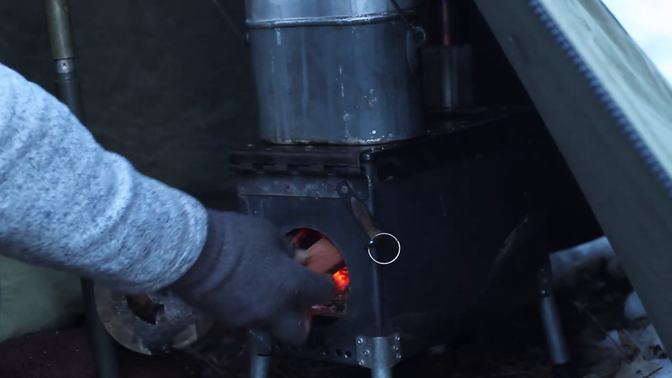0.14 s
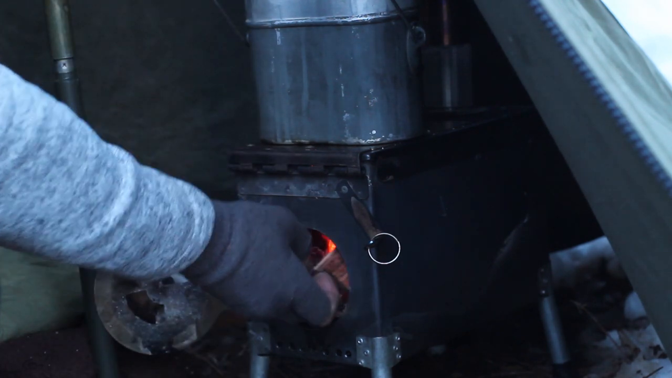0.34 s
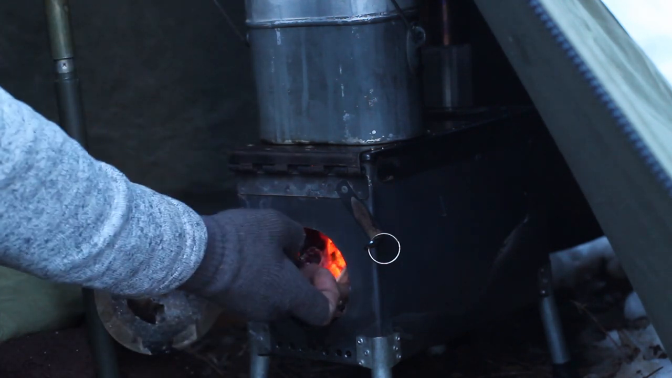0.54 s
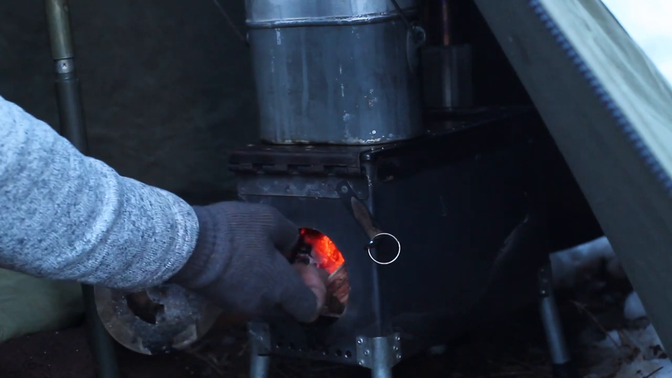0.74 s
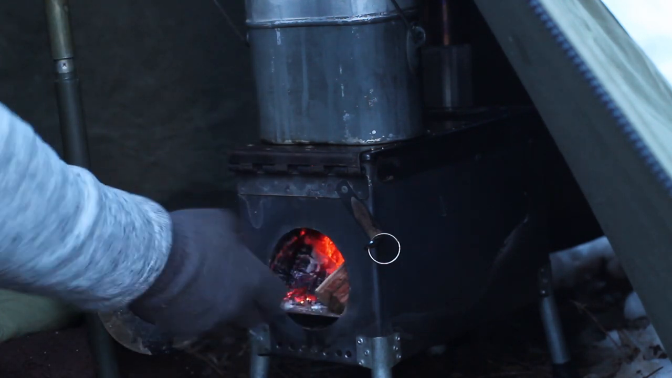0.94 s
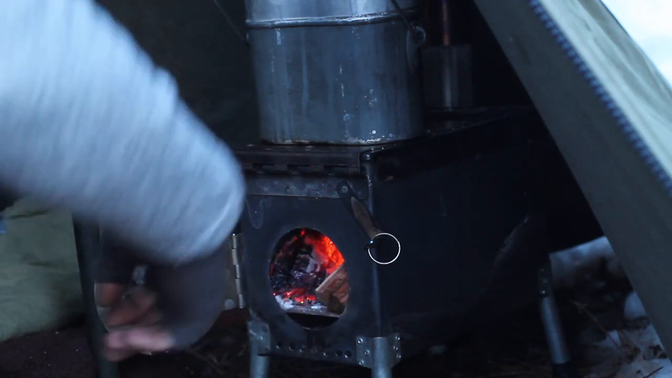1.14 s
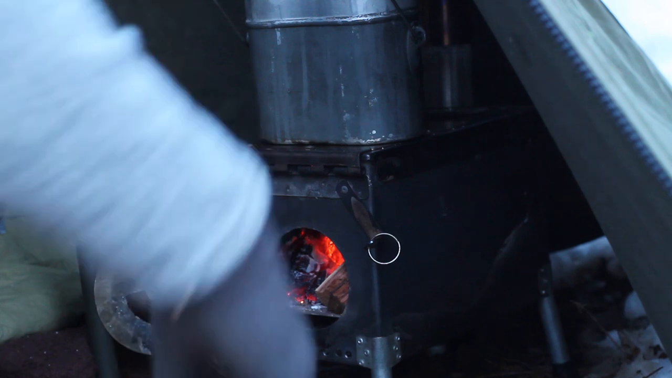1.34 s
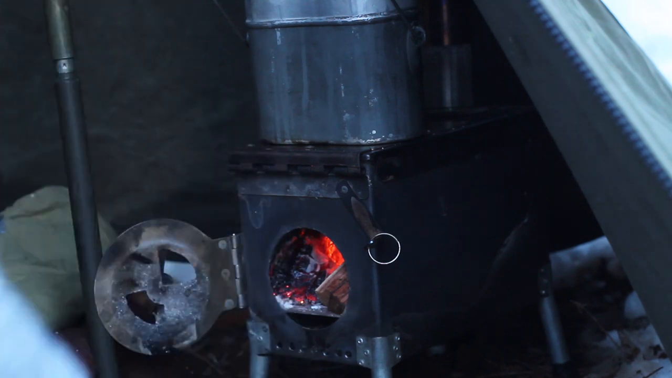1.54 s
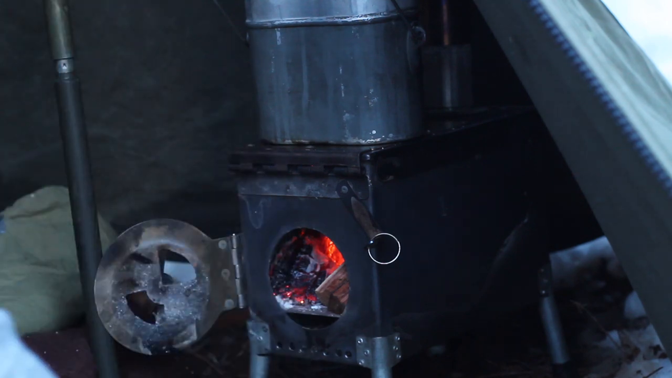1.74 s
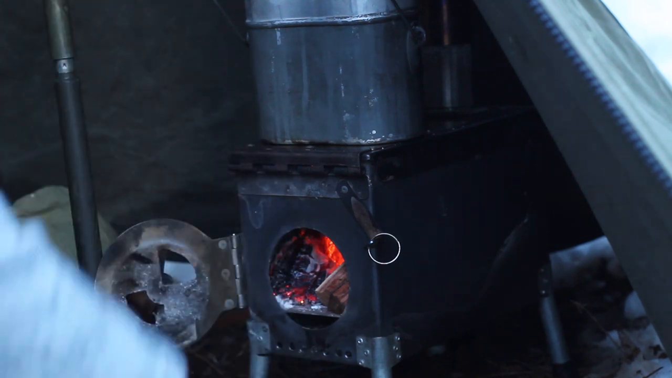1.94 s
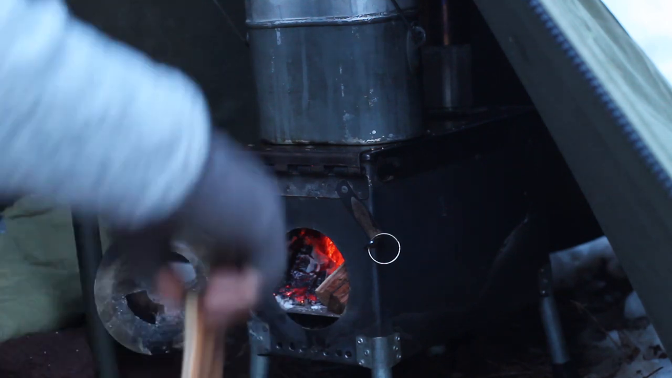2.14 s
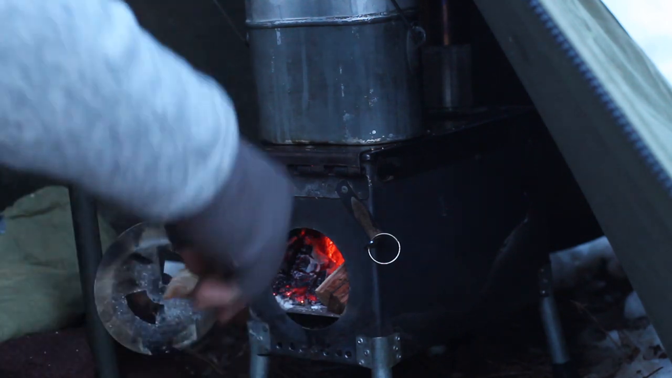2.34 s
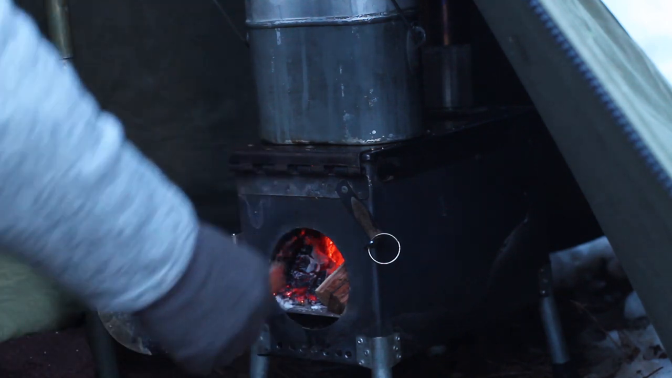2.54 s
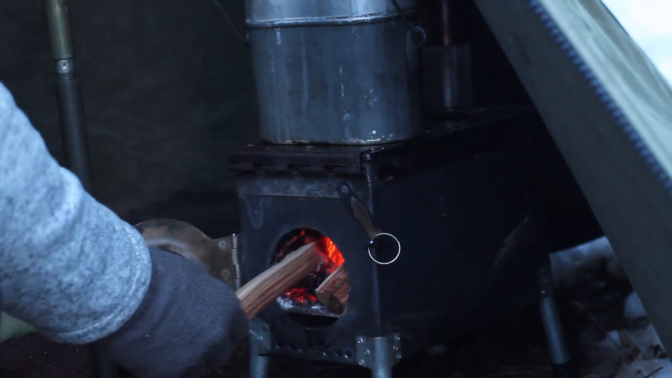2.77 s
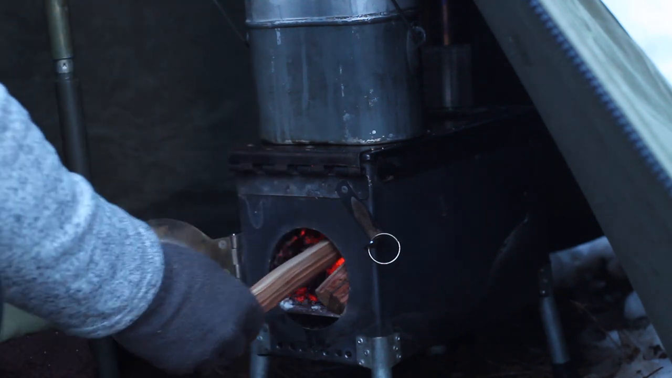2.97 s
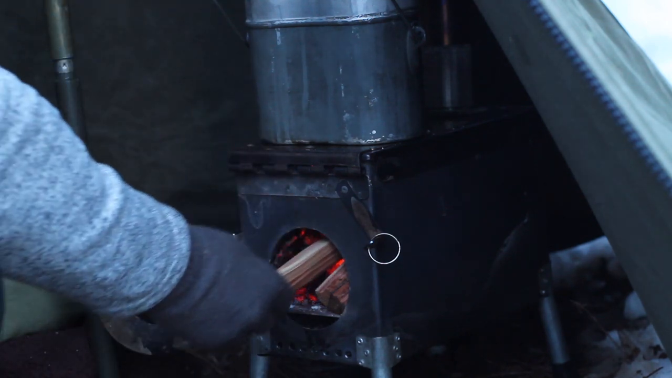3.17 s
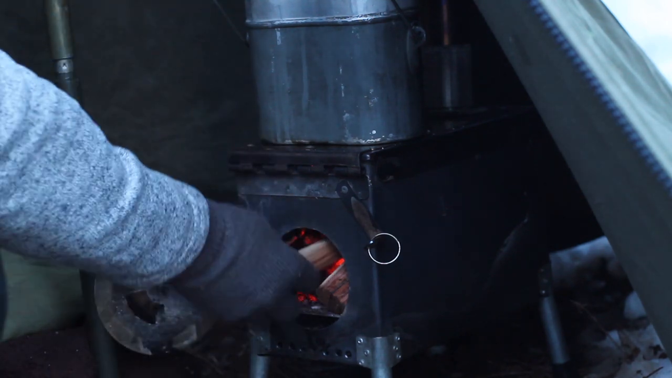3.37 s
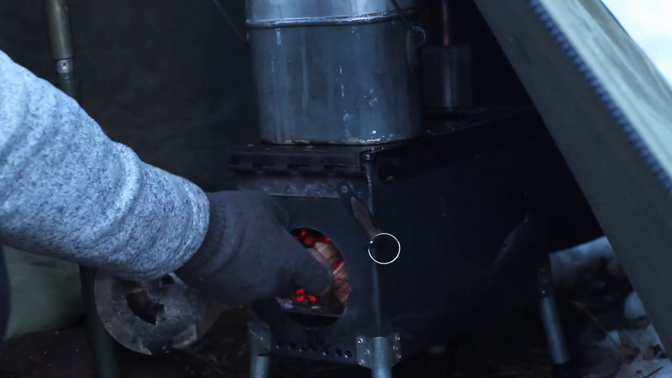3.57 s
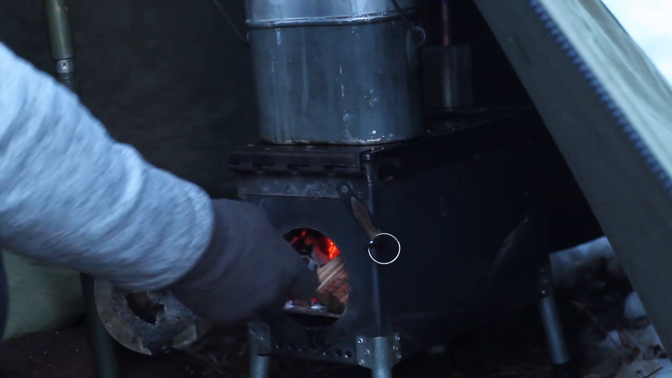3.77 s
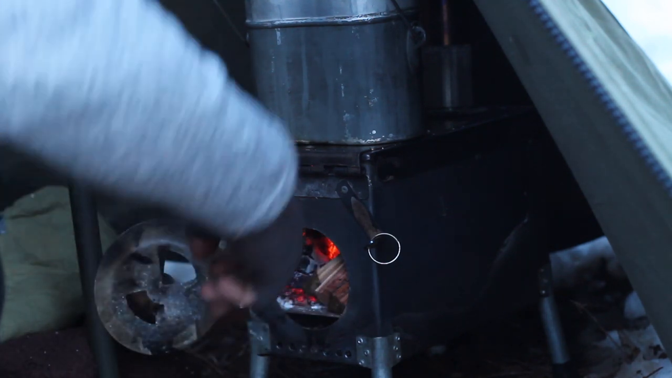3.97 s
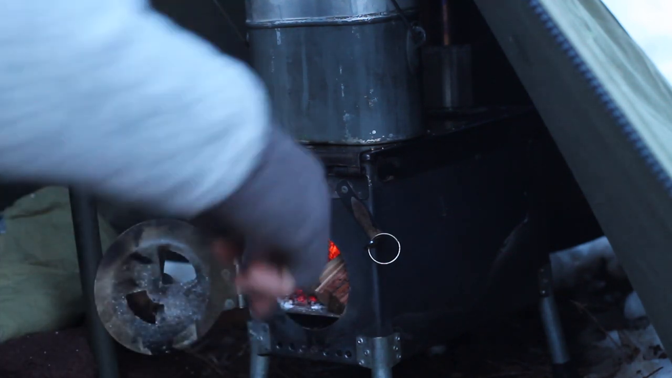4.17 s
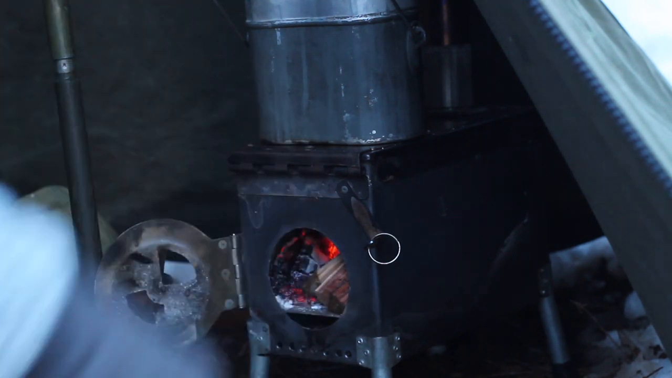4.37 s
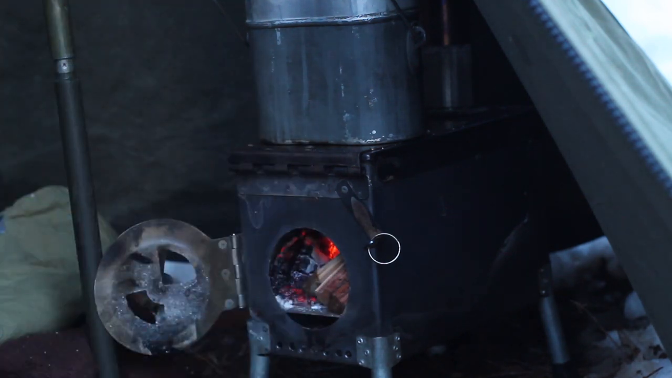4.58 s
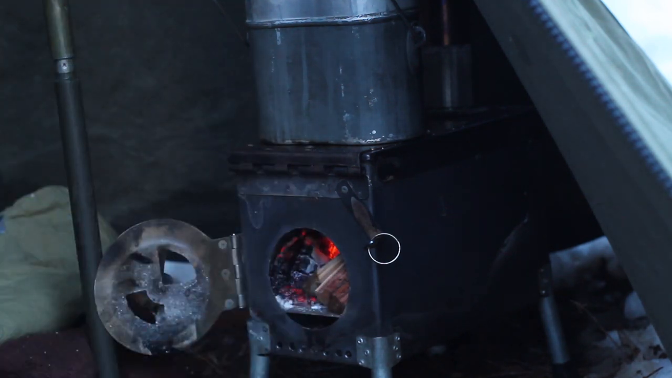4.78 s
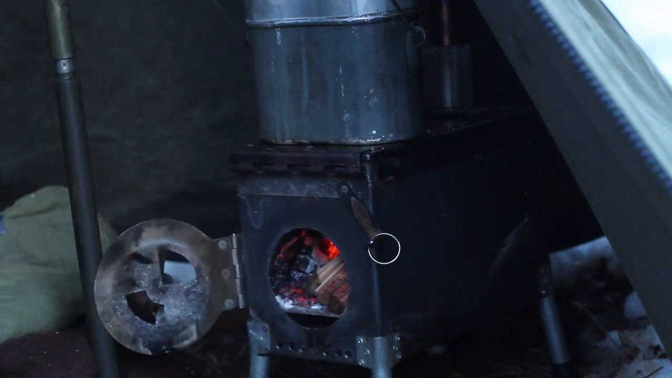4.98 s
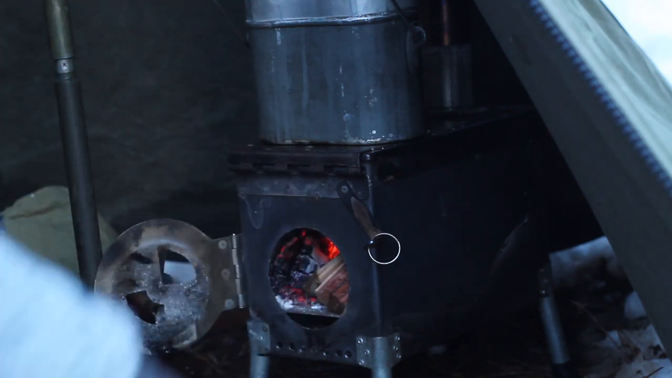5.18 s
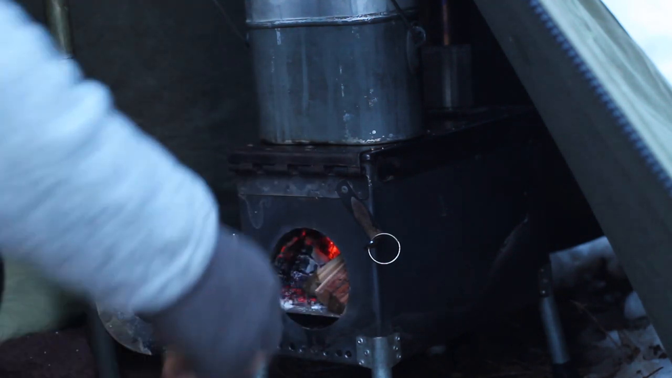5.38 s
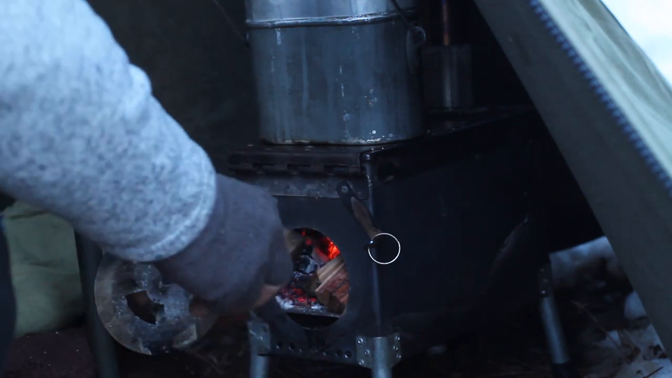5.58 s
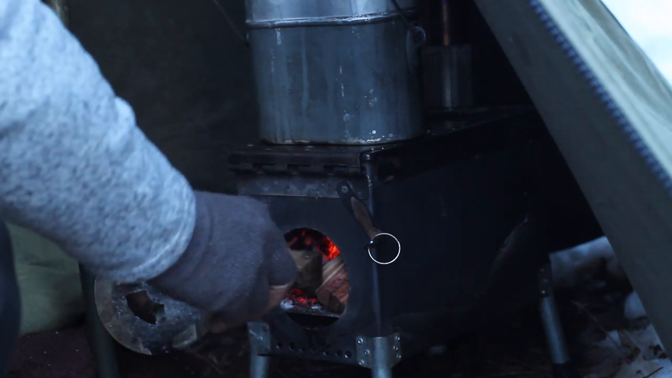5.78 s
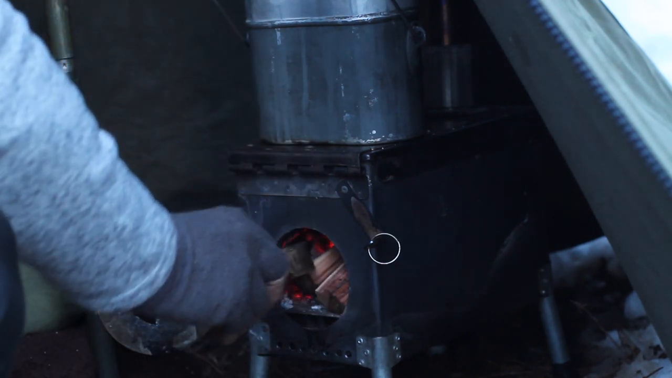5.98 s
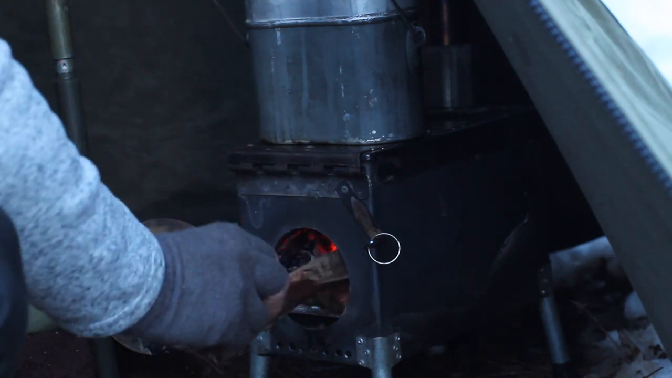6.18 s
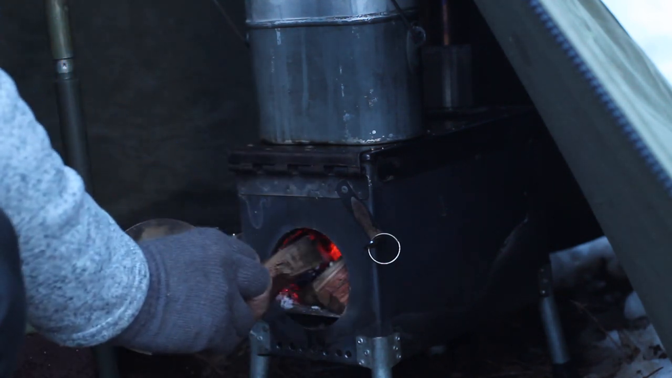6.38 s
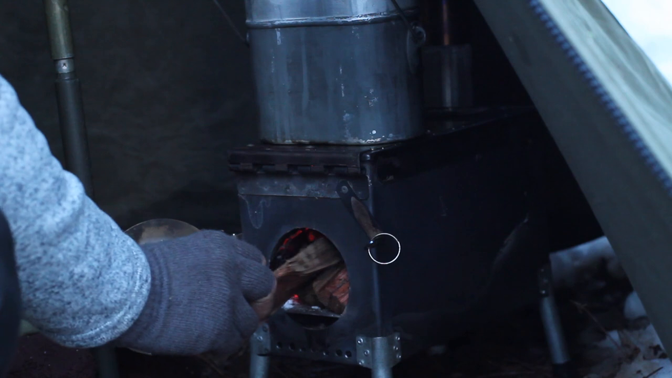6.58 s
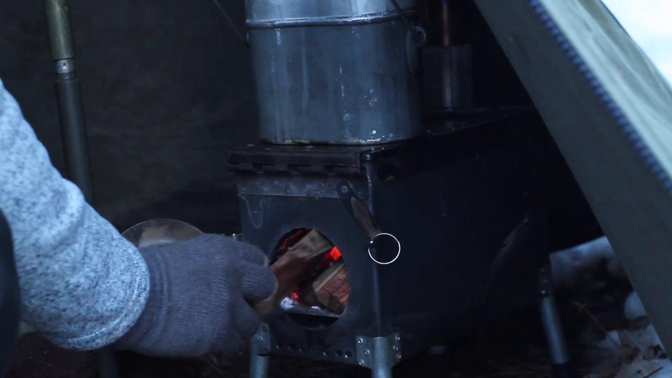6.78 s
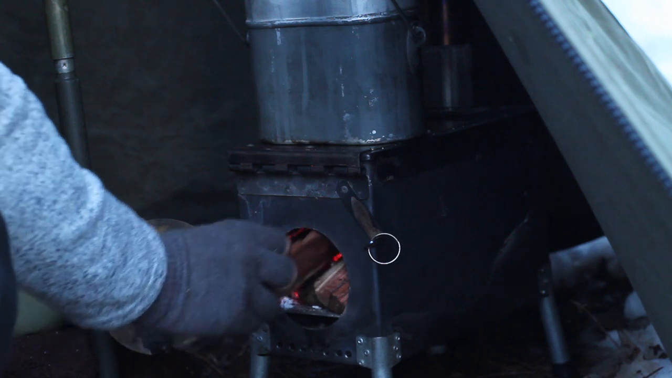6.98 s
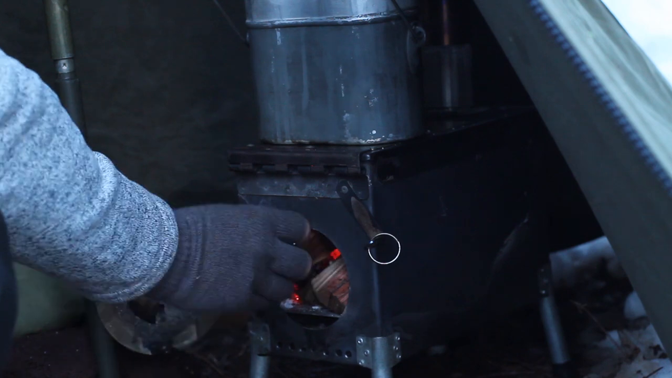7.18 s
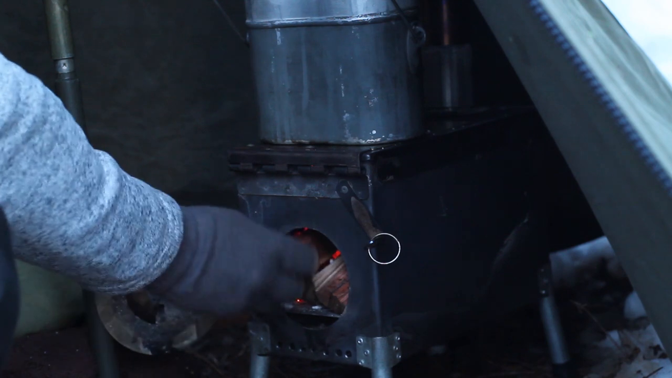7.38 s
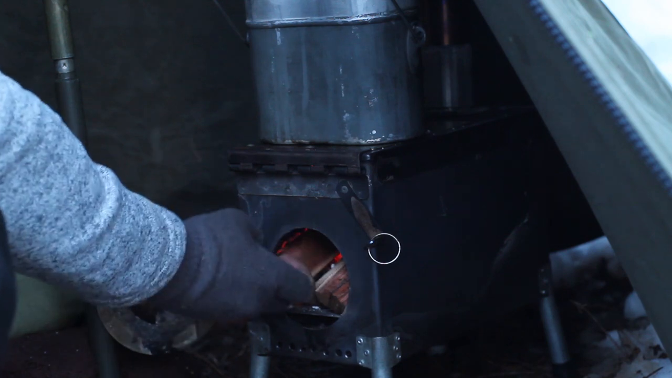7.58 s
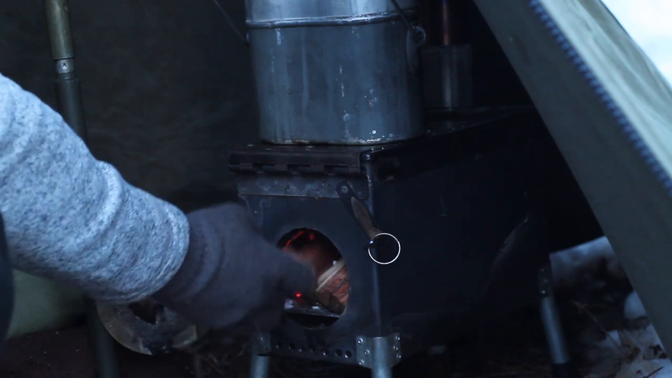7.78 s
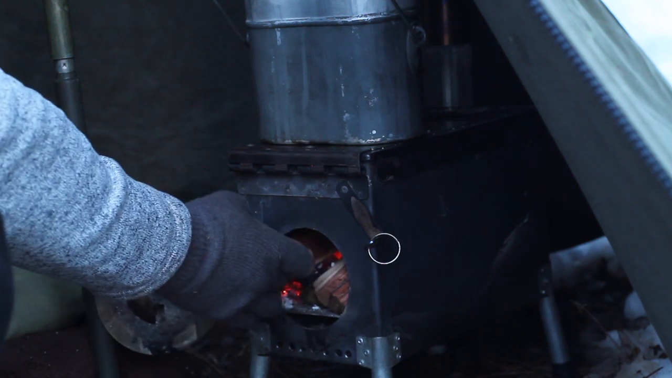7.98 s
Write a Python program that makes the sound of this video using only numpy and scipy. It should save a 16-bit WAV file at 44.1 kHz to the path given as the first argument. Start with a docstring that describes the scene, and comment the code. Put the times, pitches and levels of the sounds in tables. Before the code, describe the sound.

Close to a small steel stove in a tent, a log clatters and scrapes in with quick hollow knocks, ending in a hard shove that leaves the metal ringing. The fire then pops and ticks, with one loud splitting snap. A sleeve swishes, a second log thuds in softly with a thin squeak, and later more wood knocks and scrapes over a faint draught.

```python
"""Over the soft roar of the draught and a faint rustle of cloth, split logs knock and scrape into a small steel stove
in a tent: each knock rings damped box modes, each scrape is a run of tiny slips. Soon the fire pops and ticks,
as gas bursts and rings splinters; a hard shove leaves the steel ringing, and a log splits with a loud snap.
Later a sleeve swishes past as shaped noise, dry wood squeaks thinly, and more logs knock and scrape."""
import sys
import numpy as np
from scipy import signal
from scipy.fft import rfft, irfft, next_fast_len
from scipy.io import wavfile
from scipy.ndimage import map_coordinates

SR = 44100
rng = np.random.default_rng(int(sys.argv[2]) if len(sys.argv) > 2 else 0)


def wrap_up_sound(samples):
    """Save the sound to the file named by the first command line argument, as 16-bit audio."""
    columns = np.atleast_2d(samples).T
    # keep every value between -1 and 1, then stretch to whole-number steps
    tamed = np.clip(columns, -1, 1)
    steps = np.round(tamed * 32767).astype(np.int16)
    wavfile.write(sys.argv[1], SR, steps)


N = 353682  # length in samples, about 8 s

# Below, t60 is the time a sound takes to fall by 60 dB. Levels are before later mixing.
# low modes of the firebox: f/Hz, level/dB, t60/s
BOX_MODES = [(247, -9, 0.14), (279.5, 2.5, 0.15), (302.6, 6.5, 0.074), (342, 9.5, 0.063), (414, -4.5, 0.11),
             (458.2, -2, 0.26), (488, -3.5, 0.15), (628, -6.5, 0.086), (748, -6, 0.082)]
# dull rasp of wood on steel, as a spectrum: f/Hz, level/dB
RASP_SPECTRUM = [(150, -31), (500, -8), (800, -5), (1200, -1.5), (1500, -2), (2200, 1.5), (3300, -4.5),
                 (4800, -11.5), (8000, -11.5), (16000, -30)]
# bright hiss of splinters, as a spectrum: f/Hz, level/dB
SPLINTER_SPECTRUM = [(1000, -15.5), (3200, 3.5), (5000, 3), (8000, 4.5), (10500, 2.5), (13000, -5),
                     (15500, -18)]


def amp(db):
    """Turn decibels into a gain."""
    return 10 ** (np.asarray(db) / 20)


def unit(x):
    """Scale to an average strength (rms) of 1."""
    return x / np.sqrt(np.mean(x ** 2) + 1e-20)


def clock(seconds):
    """Give the time of each sample, in seconds from 0."""
    return np.arange(int(seconds * SR)) / SR


def curves(rows):
    """Join the points of each column into a dB curve, at -120 dB outside the rows."""
    s, *columns = np.transpose(rows)
    times = np.arange(N) / SR
    return [np.interp(times, s, column, left=-120, right=-120) for column in columns]


def wobble(rate):
    """Draw a smooth random curve through `rate` random points a second."""
    points = rng.standard_normal(int(N * rate / SR) + 4)
    return map_coordinates(points, [np.arange(N) * rate / SR])


def colour(x, spectrum):
    """Filter x by a spectrum of (Hz, dB) points, then scale it to rms 1."""
    f, db = np.transpose(spectrum)
    m = next_fast_len(len(x))
    bins_hz = np.fft.rfftfreq(m, 1 / SR)
    gain = amp(np.interp(np.log(bins_hz + 1), np.log(f), db))
    return unit(irfft(rfft(x, m) * gain, m)[:len(x)])


def add(track, s, sound):
    """Mix a sound into the track from time s, in seconds."""
    part = track[max(0, round(s * SR)):][:len(sound)]
    part += sound[:len(part)]


def ring(modes, seconds, scatter_db=0):
    """Sum dying sine waves, one for each mode; scatter_db varies their strengths at random."""
    t = clock(seconds)
    total = np.zeros(len(t))
    for hz, db, t60 in modes:
        level_db = db + scatter_db * rng.standard_normal() - 60 * t / t60
        total += amp(level_db) * np.sin(2 * np.pi * hz * t)
    return total


def resonate(x, response, share):
    """Blend x with its echo through a body or room; share is the energy weight of the echo."""
    share = np.clip(share, 0, 1)
    echo = signal.fftconvolve(x, response / np.linalg.norm(response))[:len(x)]
    return np.sqrt(1 - share) * x + np.sqrt(share) * echo


def slips(rate, spread_db):
    """Make tiny impacts of random size at random moments, about `rate` a second."""
    happens = rng.random(N) < rate / SR
    return happens * rng.standard_normal(N) * amp(spread_db * rng.standard_normal(N))


def burst(spectrum, t60):
    """Make coloured noise that starts at once and dies away."""
    t = clock(.5)
    return colour(rng.standard_normal(len(t)), spectrum) * amp(-60 * t / t60)


def swell(length, band, db):
    """Make noise in a band that rises and falls smoothly."""
    shape = np.hanning(int(length * SR))
    return amp(db) * shape * colour(rng.standard_normal(len(shape)), band)


def radiated(x, corner_hz):
    """Cut the deep bass, which a small box radiates poorly."""
    highpass = signal.butter(4, corner_hz, "highpass", fs=SR, output="sos")
    return signal.sosfilt(highpass, x)


def air():
    """The draught is noise: a soft roar, a low rumble and a hollow note in the flue."""
    # spectra of the roar, the rumble and the flue: f/Hz, level/dB
    roar_spectrum = [(12, -46), (20, -19.5), (113, -5.5), (310, -4), (377, -3.5), (472, -5.5), (590, -2),
                     (1610, -15), (5680, -24), (10500, -23.5), (14700, -32), (16000, -53)]
    rumble_spectrum = [(20, -22), (60, -3), (110, 0.5), (180, 1), (260, -18), (1000, -59)]
    flue_spectrum = [(300, -20), (520, -5), (600, -3), (700, -4.5), (900, -8.5), (1500, -35)]
    # air moving through the stove: t/s, rumble level/dB, flue level/dB
    draw = [(0, -50, -73), (1.5, -50, -69), (2.6, -55, -76), (3.6, -53, -53.5), (4.8, -57.5, -63),
            (6, -66, -51.5), (7, -60, -48), (8.02, -53, -45)]

    def noise(spectrum):
        """Steady noise of one colour."""
        return colour(rng.standard_normal(N), spectrum)

    rumble_gain, flue_gain = amp(curves(draw))
    moving_air = amp(-46.0) * noise(roar_spectrum)
    moving_air += rumble_gain * noise(rumble_spectrum)
    moving_air += flue_gain * noise(flue_spectrum)
    return amp(0.91 * wobble(7)) * moving_air


def sleeve():
    """Cloth rustles with the speed of the arm, which rises and falls in each reach."""
    # the arm reaches in or out: middle t/s, length/s, level/dB
    reaches = [(2.9, 1.1, -80), (3.595, 0.5, -50.5), (4.31, 0.68, -51), (5.482, 1, -54.5),
               (6.087, .7, -57.5), (6.797, 2.6, -63), (7.8, 1.47, -49)]
    # sound of the cloth: f/Hz, level/dB
    cloth_spectrum = [(500, -9), (1500, 9), (4000, 2.5), (7000, 4.5), (10500, 7.5), (13000, -1),
                      (16000, -12)]
    speed = np.full(N, amp(-62))  # a faint rustle between reaches
    for s, length, db in reaches:
        add(speed, s - length / 2, amp(db) * np.hanning(int(length * SR)))
    cloth = colour(slips(rate=12000, spread_db=5.0), cloth_spectrum)
    return speed * amp(0.68 * wobble(25)) * cloth


def knocks():
    """Each blow favours the box modes near its own pitch; returns the boom and the force on the walls."""
    # a log strikes the box: t/s, boom level/dB, most excited f/Hz, wall clank level/dB,
    # the log's own note f/Hz, its level/dB
    blows = [(0.001, -25, 456, -55.5, 781, -41), (0.16, -10.5, 485, -34, 2920, -21),
             (0.273, -19.5, 446, -52, 667, -50), (0.357, -20, 320, -31.5, 2120, -16.5),
             (0.371, -3, 260, -45, 2140, -26), (0.424, -9.5, 253, -39.5, 1770, -35),
             (0.641, -10, 319, -35.5, 2120, -23), (0.709, -15.5, 330, -41, 960, -32),
             (0.739, 1, 296, -16, 1860, -18), (0.772, -1, 413, -27, 2370, -12),
             (0.781, -7, 310, -22, 2360, -11), (3.54, -16, 282, -45, 1690, -24.5),
             (3.574, -12.5, 310, -55, 660, -48), (3.611, -10.5, 298, -45, 660, -52),
             (3.684, -16, 280, -42, 1290, -35), (3.794, -27.5, 290, -45.5, 1290, -37),
             (4.261, -33, 353, -53, 826, -34.5), (5.945, -16.5, 295, -44.5, 1740, -32),
             (6.259, -12.5, 387, -39.5, 937, -20), (7.01, -23.5, 270, -57, 660, -45),
             (7.161, -23, 410, -47, 1560, -30), (7.232, -19, 350, -57, 685, -31),
             (7.52, -1, 316, -32, 650, -26), (7.582, -8, 298, -35.5, 925, -26),
             (7.891, -13, 308, -39, 2120, -37)]
    boom, force, t = np.zeros(N), np.zeros(N), clock(.5)
    for s, db, pitch_hz, clank_db, log_hz, log_db in blows:
        # each octave away from the blow's pitch costs a box mode 15 dB
        modes = [(hz, level - 15 * abs(np.log2(hz / pitch_hz)), t60) for hz, level, t60 in BOX_MODES]
        panel = ring([(pitch_hz, 0, .045)], .5)  # the struck panel flexes for a few cycles
        gradual_push = 1 - np.exp(-t / 0.0074)  # soft wood pushes gradually
        thud = (ring(modes, .5, scatter_db=1) + amp(9.5) * panel) * gradual_push

        # bending modes of the log: f/Hz, level/dB, cycles of ring
        bending = [(log_hz, 2, 48), (log_hz * 1.6, -4, 40), (log_hz * 1.6, -6, 40)]
        note = amp(log_db) * ring([(hz, level, cycles / hz) for hz, level, cycles in bending], .5)
        crush = 1 - np.exp(-t / .002)  # the contact builds up over about 2 ms
        add(boom, s, amp(db - 6) * thud / np.abs(thud).max() + crush * note)

        dull = amp(6) * burst(RASP_SPECTRUM, t60=0.065)
        bright = amp(6.5) * burst(SPLINTER_SPECTRUM, t60=0.057)
        add(force, s, crush * amp(clank_db) * (dull + bright))
    return boom, force


def stroke(length, stop_db_per_s):
    """One push takes hold in 16 ms, eases by 10 dB a second, then dies away faster."""
    t = clock(.6)
    after_push = np.maximum(t - length, 0)
    return np.minimum(t / 0.016, 1) * amp(-10 * t - stop_db_per_s * after_push)


def scrapes():
    """Wood sticks and slips on the rim; returns the judder of the box and the force on the walls."""
    # a log slides on the steel: t/s, length/s, rasp level/dB, splinter hiss level/dB, box judder level/dB
    strokes = [(0.074, 0.064, -57, -43.5, -38), (0.155, 0.026, -32.5, -43, -31),
               (0.207, 0.065, -57, -40.5, -39.5), (0.316, .035, -52, -38, -32.5),
               (0.352, 0.046, -27, -39, -23.5), (0.469, 0.053, -38, -38, -31.5),
               (0.599, 0.073, -39.5, -41, -33), (0.699, .06, -31, -34, -25.5),
               (0.775, 0.098, -17.5, -10.5, -19.5), (3.466, 0.019, -60, -46, -36.5),
               (3.529, 0.15, -46, -51, -34), (5.965, 0.074, -53, -37.5, -37.5),
               (6.255, 0.016, -36, -56, -28), (7.152, 0.086, -38.5, -43.5, -33.5),
               (7.308, 0.044, -46, -45, -34), (7.438, 0.1, -35.5, -37, -28.5),
               (7.518, 0.066, -34, -35.5, -27), (7.636, 0.013, -65, -40, -41),
               (7.745, 0.064, -61, -57, -33), (7.838, 0.03, -44, -33.5, -31.5),
               (7.881, 0.048, -35, -31.5, -26.5), (7.982, 0.036, -61, -62, -38)]
    # well-damped modes of a sliding log: f/Hz, level/dB, t60/s
    log_modes = [(1350, -9.5, 0.024), (1760, 0, 0.011), (2310, -3.5, 0.0073), (3270, 12, 0.0074),
                 (4400, 0, .012), (5670, 3, .012)]
    rasp, hiss, judder = np.zeros((3, N))
    for s, length, rasp_db, hiss_db, judder_db in strokes:
        push = stroke(length, stop_db_per_s=329)
        add(rasp, s, amp(rasp_db) * push)
        add(hiss, s, amp(hiss_db) * push)
        # the box settles a little later than the rubbing
        add(judder, s, amp(judder_db) * stroke(length, stop_db_per_s=212))

    grip = amp(1.6 * wobble(150))
    coarse = colour(slips(rate=2600, spread_db=1.5), RASP_SPECTRUM)
    grit = unit(resonate(coarse, ring(log_modes, .1), share=0.036))
    fine = colour(slips(rate=11000, spread_db=-3.0), SPLINTER_SPECTRUM)
    rubbing = amp(-4.5) * grip * (rasp * grit + hiss * fine)

    jolts = slips(rate=1200, spread_db=1.0)
    shaken_box = signal.fftconvolve(jolts, ring(BOX_MODES, .5))[:N]
    box = unit(radiated(shaken_box, corner_hz=246))
    return amp(-1.5) * judder * box, rubbing


def pop(pitch_hz, crackle_db):
    """A sharp burst of gas rings a splinter briefly; more fibres tear in its wake."""
    # modes of a burst splinter: multiple of its pitch, level/dB, t60/s
    splinter_modes = [(.42, -13.5, .025), (.68, -12, .018), (0.999, -3, 0.024), (1.33, -11, .016)]
    # the pops are duller in the highest treble: f/Hz, level/dB
    treble_loss = [(20, 25), (9000, 1), (11500, -1), (13500, -8.5), (16000, -16)]
    t = clock(.12)
    spectrum = [(pitch_hz / 8, -26), (pitch_hz / 1.7, -11), (pitch_hz, 0),
                (pitch_hz * 1.5, -2), (pitch_hz * 3, -9)]
    crack = amp(-60 * t / 0.014)
    crackle = amp(crackle_db + 0.5 - 60 * t / 0.059) * (1 - np.exp(-t / 0.0029))
    limit_hz = 12500  # splinter modes from here up are left out
    modes = [(pitch_hz * ratio, db, t60) for ratio, db, t60 in splinter_modes if pitch_hz * ratio < limit_hz]
    splinter = ring(modes, .12)
    gas = colour(colour(rng.standard_normal(len(t)), spectrum), treble_loss)
    onset = 1 - np.exp(-t / 0.00021)
    sound = (gas * (crack + crackle) + splinter) * onset
    return sound / np.abs(sound).max()


def shove_ring():
    """A hard shove builds up a long ring in the steel."""
    # f/Hz, level/dB, t60/s
    steel_modes = [(991, -38, 1.65), (4011, -29, .5), (11380, -33, .45)]
    return ring(steel_modes, 2) * (1 - np.exp(-clock(2) / 0.045))


def splitting_snap():
    """A splitting log rings a few short modes, with a rasping burst of noise."""
    # f/Hz, level/dB, t60/s
    snap_modes = [(820, -36, 0.013), (1080, -19, 0.025), (1500, -1, 0.0067), (3160, -7, 0.023),
                  (4680, -10, 0.0065), (8200, -17.5, .008), (10260, -16.5, 0.008)]
    snap = radiated(ring(snap_modes, .5), corner_hz=424)
    return amp(-4.5) * snap + amp(-22.5) * burst(RASP_SPECTRUM, t60=0.044)


def sizzle(length):
    """Sap sizzles: a short swell of bright noise."""
    sap_hz = 7200
    band = [(sap_hz / 4, -10), (sap_hz / 1.0, -9), (sap_hz, 0), (sap_hz * 2, -20)]
    return swell(length, band, db=-45)


def fire(count=44):
    """The fire gives clear pops, one loud snap with a brief sizzle, and a scatter of faint ticks."""
    # fibres burst: t/s, level/dB, pitch f/Hz, crackle after the burst level/dB
    pops = [(0.366, -20, 10340, -18), (1.095, -20.5, 7850, -19), (1.173, -17.5, 8760, -22),
            (1.211, -36, 11200, -13), (1.487, -33.5, 9700, -12), (1.7415, -30, 7500, -21),
            (1.841, -22, 5740, -14), (1.884, -24.5, 6950, -9), (2.024, -31, 3360, 11),
            (2.091, -33, 8900, -14), (2.11, -23, 11160, -12), (2.155, -26.5, 8300, 3),
            (2.606, -30, 10340, 3), (3.477, -28.5, 10200, -9), (3.569, -23.5, 9500, -12),
            (4.359, -16, 6930, -11), (4.504, -30.5, 6160, -21), (4.842, -31, 6850, -19),
            (4.962, -32.5, 8670, -2), (5.181, -33, 2800, -14), (5.397, -31.5, 5550, -18),
            (5.443, -29, 4200, -7), (5.46, -30.5, 4880, -6), (5.556, -29, 10500, -20),
            (5.897, -34, 3400, -19), (6.704, -15, 8500, -18), (6.997, -30, 7500, -6),
            (7.789, -27, 6830, -12), (7.852, -20.5, 6270, -6)]
    sound = np.zeros(N)
    for s, db, pitch_hz, crackle_db in pops:
        add(sound, s, amp(db) * pop(pitch_hz, crackle_db))
    add(sound, 1.9728, splitting_snap())
    sizzle_middle_s, sizzle_length_s = 2, 0.06
    add(sound, sizzle_middle_s - sizzle_length_s / 2, sizzle(sizzle_length_s))
    for when, size, tone in rng.random((count, 3)):
        tick_db = -44 + 8 * size  # from the faintest tick to the loudest
        add(sound, when * N / SR, amp(tick_db) * pop(3500 + 7000 * tone, crackle_db=-8))
    return sound


def squeaks():
    """Dry wood squeals thinly on the rim: its grain catches briefly, heard as noise in a narrow band."""
    # middle t/s, length/s, f/Hz, level/dB
    squeals = [(3.523, 0.038, 3280, -52), (3.555, 0.023, 3220, -50), (3.625, 0.052, 3100, -53),
               (7.275, 0.12, 3270, -53), (7.34, 0.046, 3150, -49), (7.46, 0.064, 3250, -44),
               (7.782, .03, 3080, -48)]
    sound = np.zeros(N)
    for s, length, pitch_hz, db in squeals:
        band = [(pitch_hz * .85, -40), (pitch_hz, 0), (pitch_hz * 1.15, -40)]
        add(sound, s - length / 2, swell(length, band, db))
    return sound


def stove():
    """Knocks, scrapes and squeaks sound through the firebox and its thin walls."""
    # modes of the steel walls: f/Hz, level/dB, t60/s
    wall_modes = [(926, -10.2, 0.19), (1152, -6.6, 0.19), (1217, -2.7, 0.19), (1314, -6.0, 0.19),
                  (1701, -7.5, 0.19), (1820, -5.1, 0.19), (2119, -6.6, 0.19), (2358, 0.3, 0.19),
                  (2659, -9.3, 0.19), (3015, -3.0, 0.19), (3187, -3.6, 0.19), (3521, 0.3, 0.19),
                  (3740, -6.1, 0.19), (4091, -7.5, 0.19), (4274, -3.8, 0.19), (4393, -5.0, 0.19),
                  (4673, -5.1, 0.19), (4727, -5.8, 0.19), (5609, -8.2, 0.15), (6374, -4.5, 0.15),
                  (6514, -9.7, 0.15), (6858, -5.5, 0.15), (7773, -2.9, 0.15), (8032, -3.7, 0.15),
                  (8721, -0.3, 0.15), (8904, -6.2, 0.15), (9981, -6.7, 0.15), (10788, -2.6, 0.15),
                  (11111, -6.5, 0.15), (11359, -5.5, 0.15)]
    boom, blows = knocks()
    judder, rubbing = scrapes()
    # countless weak modes between the strong ones, as noise
    crowd = burst([(400, -9), (1200, 4.0), (3000, -2.0), (6000, -11.5), (15000, -6.5)], t60=0.13)
    walls = .6 * unit(ring(wall_modes, .5, scatter_db=1)) + unit(crowd)
    clatter = resonate(rubbing + blows + squeaks(), walls, share=.2)
    sound = judder + radiated(boom, corner_hz=203) + clatter
    add(sound, .79, shove_ring())
    return sound


def scene():
    """The canvas walls give the stove and fire a short, weak answer; air and sleeve stay dry."""
    answer = burst([(100, -7), (500, 0), (8000, -8), (16000, 11.5)], t60=0.3)
    tent = np.pad(answer, (round(0.0045 * SR), 0))  # the answer comes 4.5 ms late
    return (resonate(stove() + fire(), tent, share=0.02) + air() + sleeve())[None]


def record(dry):
    """Round off the highest peaks, then remove everything from the top frequency up."""
    top_hz = 15800
    rounded = dry / (1 + np.abs(dry) ** 6) ** (1 / 6)
    m = next_fast_len(N + SR // 2)
    kept = np.fft.rfftfreq(m, 1 / SR) < top_hz
    return irfft(rfft(rounded, m) * kept, m)[..., :N]


dry = scene()
out = record(dry)
wrap_up_sound(out)
```